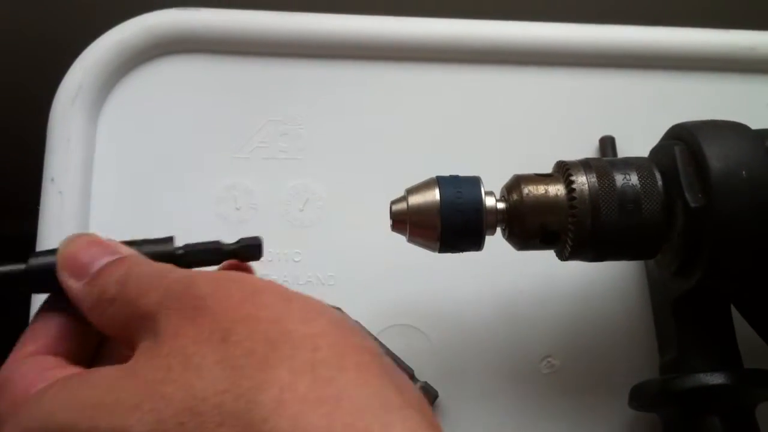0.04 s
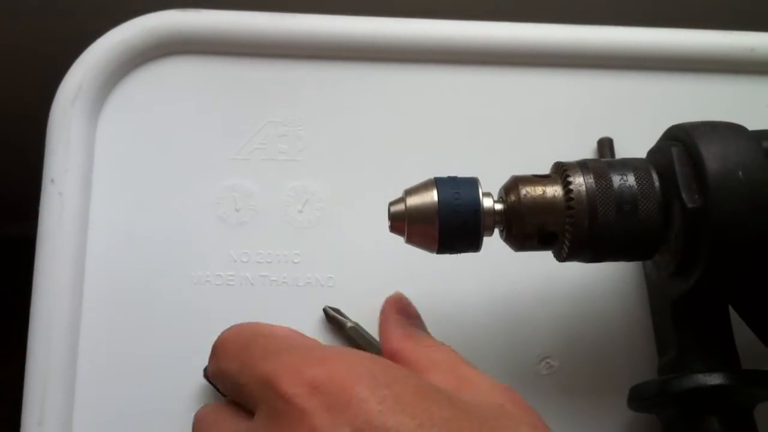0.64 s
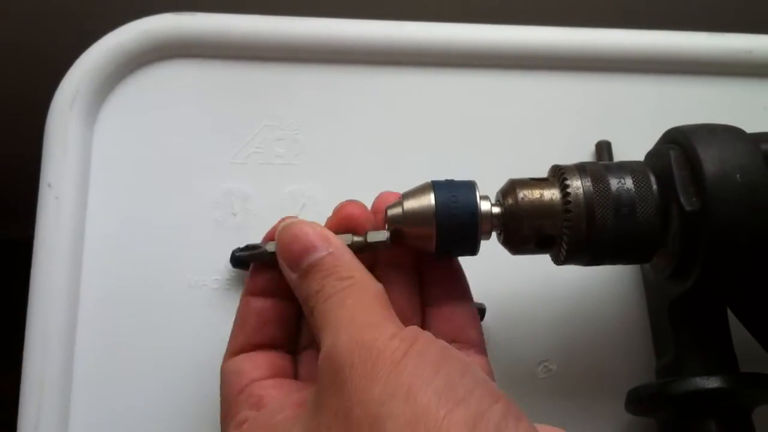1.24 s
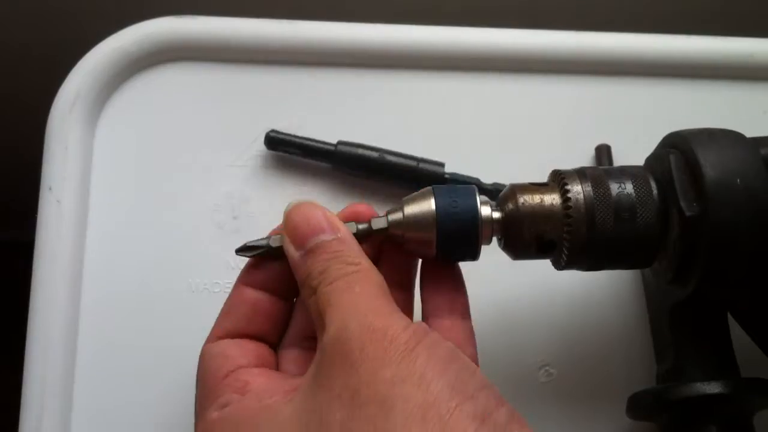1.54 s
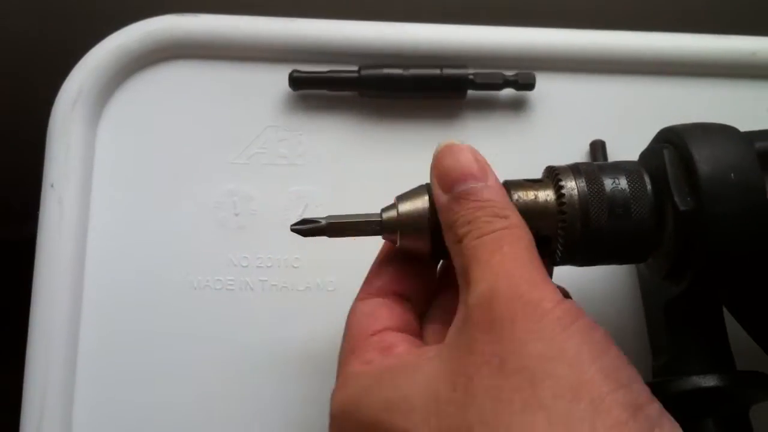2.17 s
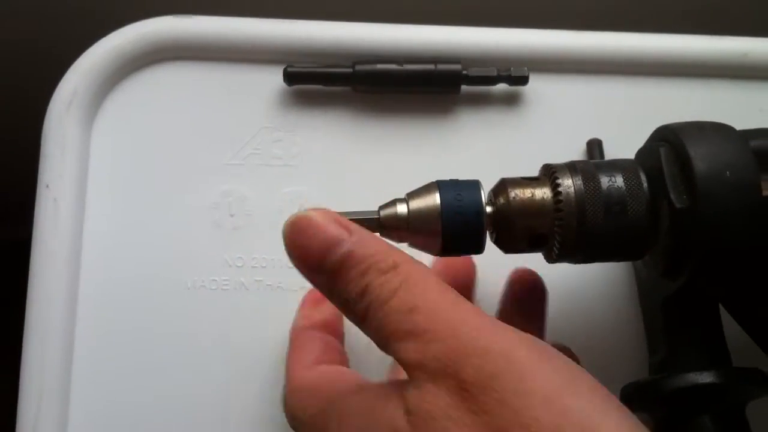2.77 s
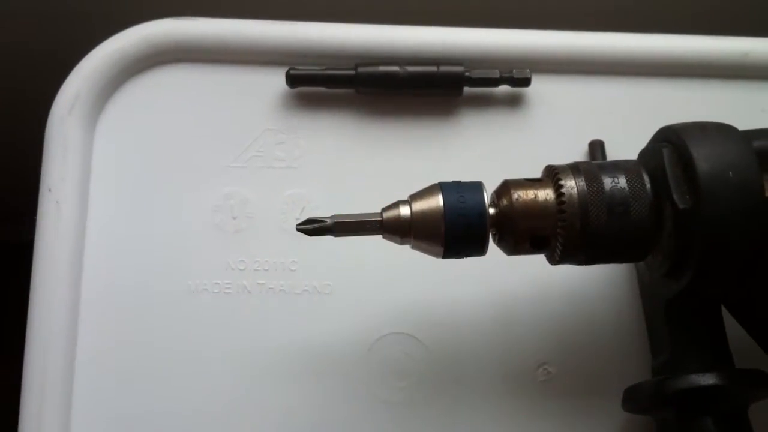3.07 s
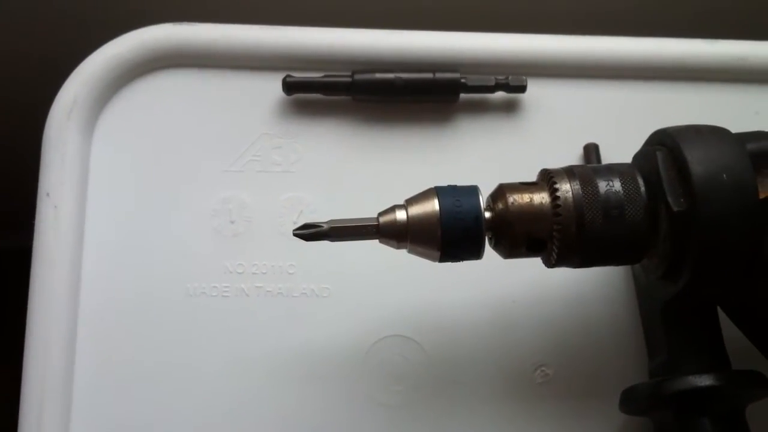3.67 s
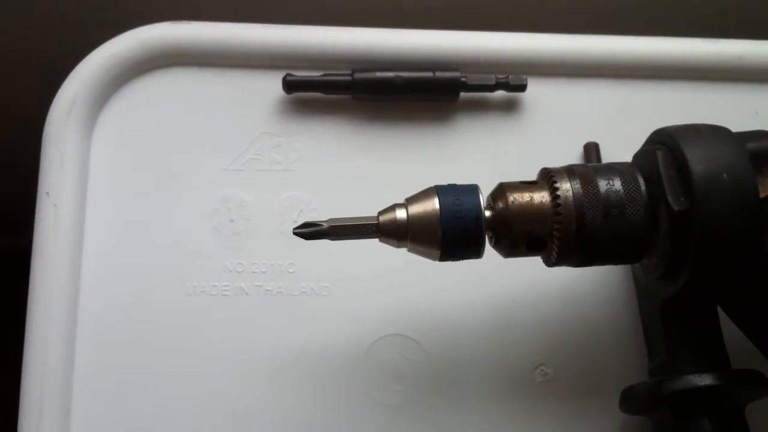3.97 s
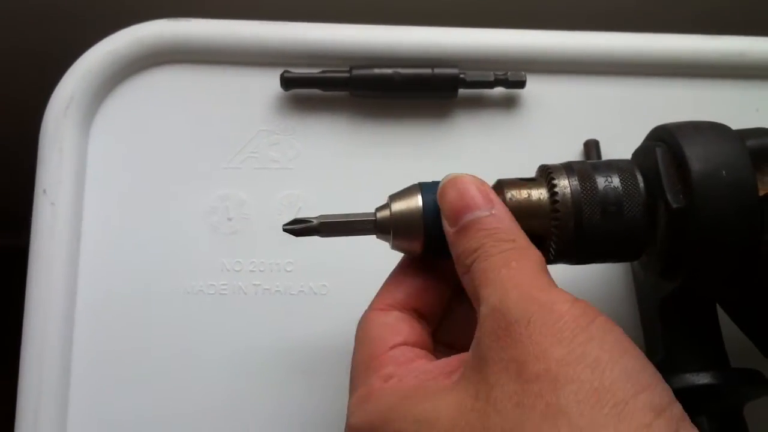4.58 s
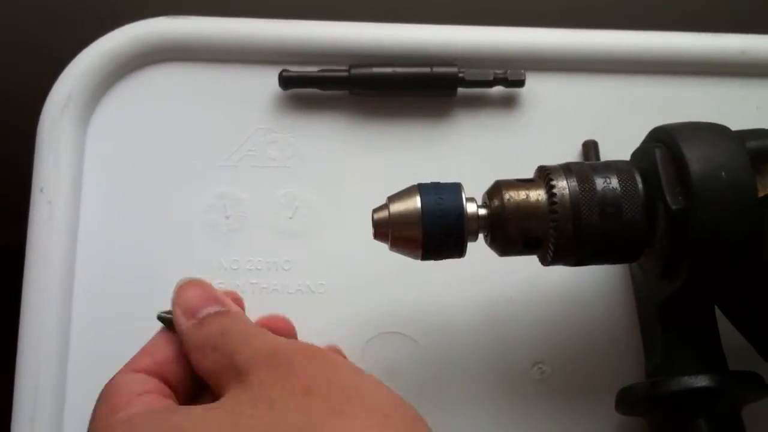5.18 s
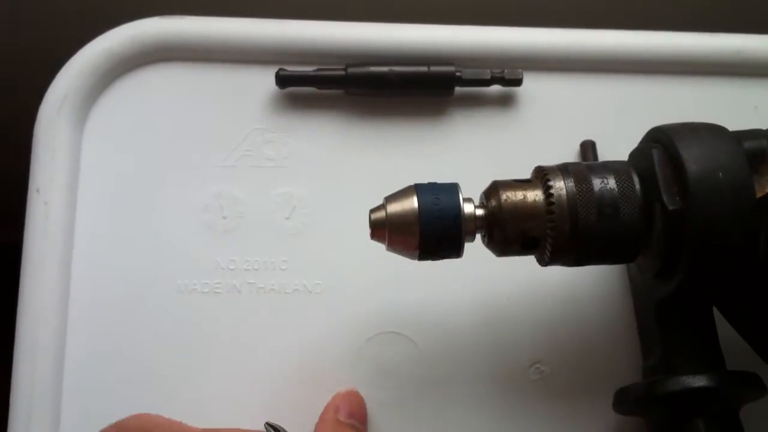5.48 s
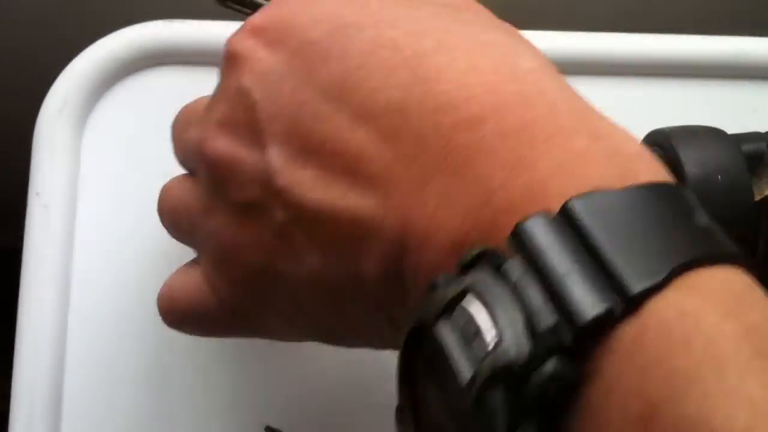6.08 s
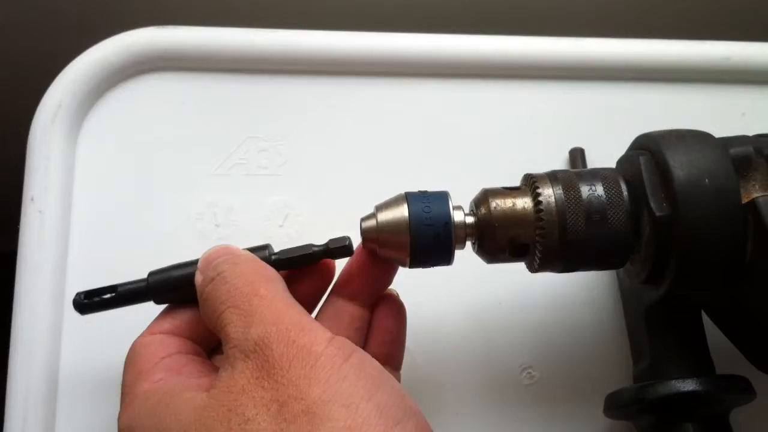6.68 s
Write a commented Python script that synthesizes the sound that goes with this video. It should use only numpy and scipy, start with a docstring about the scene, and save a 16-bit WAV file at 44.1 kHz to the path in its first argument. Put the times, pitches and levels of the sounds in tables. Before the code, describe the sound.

Steel bits click into and out of a drill chuck and clatter on a plastic tray, over a faint hiss.

```python
"""Steel bits are swapped in the quick-change chuck of a resting drill, over a plastic tray in a small room.
Over a steady hiss, fingers nudge the drill; a bit holder is put down, scrapes and rolls across the tray,
waking its modes. A screwdriver bit slides into the chuck and the sleeve snaps shut, steel ringing on steel.
The bit is released and dropped on the tray, where it bounces, and the holder is picked up again."""
import sys
import numpy as np
from scipy import signal
from scipy.fft import irfft
from scipy.io import wavfile

SR = 44100
rng = np.random.default_rng(int(sys.argv[2]) if len(sys.argv) > 2 else 0)


def pcm_store(signal):
    """Save signal as 16-bit PCM."""
    levels = np.round(np.clip(np.atleast_2d(signal), -1, 1) * 32767)
    wavfile.write(sys.argv[1], SR, levels.astype(np.int16).T)


N = 300762
TIME_S = np.arange(N) / SR
RING_S = np.arange(SR // 3) / SR  # time axis of one ring

# Spectrum of the tray's low rumble. Each row: frequency in Hz, gain in dB.
RUMBLE_SPECTRUM = [(40, -32), (85, -27.5), (120, 0.5), (165, 0.5), (200, -5), (245, 4.5), (295, 0),
                   (350, -13.5), (600, -18.5), (1200, -30), (4000, -65)]
# Spectrum of the struck chuck. Each row: frequency in Hz, gain in dB.
CHUCK_SPECTRUM = [(40, -30), (90, 0.5), (150, 5.5), (300, 5.5), (420, -18), (700, -5.5), (1200, -2),
                  (2000, 0.5), (3500, -1.5), (5000, -11.5), (6500, -4.5), (9500, -10), (13500, -2),
                  (16000, -3.5)]


def amp(db):
    """Decibels to gain."""
    return 10 ** (np.asarray(db) / 20)


def unit(x):
    """Scales to energy 1."""
    return x / np.sqrt(np.sum(x ** 2) + 1e-20)


def value_at(points, hz):
    """Linear interpolation over log frequency."""
    points_hz, values = np.transpose(points)
    return np.interp(np.log(hz + 1), np.log(points_hz), values)


def add(mix, start_s, sound):
    """Mixes a sound in at start_s."""
    part = mix[max(round(start_s * SR), 0):][:len(sound)]
    part += sound[:len(part)]


def colour(x, spectrum, size=4096):
    """Minimum-phase filter through (Hz, dB) points; attacks stay sharp."""
    hz = abs(np.fft.fftfreq(size, 1 / SR))
    log_gain = np.log(amp(value_at(spectrum, hz)))
    taps = np.fft.ifft(np.exp(np.conj(signal.hilbert(log_gain)))).real
    return signal.fftconvolve(x, taps[:size // 2])[:len(x)]


def decay(t60_s):
    """Envelope falling 60 dB in t60_s."""
    return amp(-60 * RING_S / t60_s)


def mode(hz, t60_s):
    """One decaying sine."""
    return np.sin(2 * np.pi * hz * RING_S) * decay(t60_s)


def ringing(modes):
    """Modes struck together, neighbours in opposite phase."""
    return unit(sum((-1) ** k * amp(db) * unit(mode(hz, t60_s))
                    for k, (hz, db, t60_s) in enumerate(modes)))


def grit(count, per_s, spread_db):
    """Random small contacts of uneven size, rms 1."""
    hit = rng.random(count) < per_s / SR
    sizes = amp(spread_db * np.minimum(rng.exponential(1, count), 3))
    signs = rng.choice([-1, 1], count)
    return unit(hit * sizes * signs) * np.sqrt(count)


def tap(travel_s, crack_db, wash_db, wash_t60_s, wash_hz):
    """A contact spreads as a bending wave, treble first, with a crack and a wash of crowded modes."""
    khz = np.fft.rfftfreq(len(RING_S), 1 / SR) / 1000
    wave = irfft(np.exp(-4000j * np.pi * travel_s * np.sqrt(khz)), len(RING_S))  # travel_s at 1 kHz
    crack, wash = rng.standard_normal((2, len(RING_S)))
    wash = signal.lfilter([1], [1, -np.exp(-2 * np.pi * wash_hz / SR)], wash)
    return (unit(wave * decay(t60_s=0.17))
            + amp(crack_db) * unit(crack * decay(t60_s=0.021))
            + amp(wash_db) * unit(wash * decay(wash_t60_s)))


def blow(ring, db, bass_db=0, clack_db=0, treble_db=0):
    """A heavy contact adds bass, a hard one clack and treble; db refers to energy spread over 5 ms."""
    force = [(290, bass_db), (420, 0), (950, 0), (1450, clack_db), (3000, clack_db), (6500, treble_db)]
    return amp(db) * np.sqrt(0.005 * SR) * colour(ring, force)


def hiss():
    """Room air: low, nearly steady noise."""
    # Each row: frequency in Hz, relative gain in dB.
    spectrum = [(18, -93.5), (30, -36), (69, -21), (177, -0.5), (292, -3), (324, -7.5), (389, -5),
                (518, -3), (561, -7.5), (830, -6), (1330, -13), (1470, -12), (2990, -20), (4420, -28),
                (15500, -34)]
    # Each row: time in seconds, rms level in dB.
    levels = [(0, -52), (2.6, -52), (3.05, -55.5), (3.6, -54), (6.8, -52.5)]
    rms = amp(np.interp(TIME_S, *np.transpose(levels)))
    return rms * np.sqrt(N) * unit(colour(rng.standard_normal(N), spectrum))


def tray_tone():
    """The tray's clear modes, struck together."""
    # Each row: frequency in Hz, relative level in dB.
    modes = [(130, -1), (152, 2), (166, 2), (243, -2), (276, -2), (298, -3), (350, -5), (372, -6),
             (530, -2), (765, 1), (908, -1), (1110, -4), (1360, -3), (1435, 2), (1560, -1), (1705, 0),
             (1826, -3), (2232, 0), (2430, -2), (2483, -1), (2784, -3), (2940, -3), (3180, 0), (3290, -1),
             (3838, -2)]
    # Each row: frequency in Hz, t60 in seconds.
    ring_times = [(150, 0.24), (300, 0.32), (800, 0.14), (3500, 0.091)]
    return ringing([(hz, db, value_at(ring_times, hz)) for hz, db in modes])


def tray():
    """The thin plastic tray, struck once; its wash differs from spot to spot."""
    # Each row: frequency in Hz, gain in dB.
    spectrum = [(40, -15), (85, -13), (110, 2), (145, 10.5), (300, 6.5), (450, 1), (900, 4), (1500, 0.5),
                (3200, -8), (4200, -8.5), (6200, -4.5), (9000, -7.5), (15000, -14.5)]
    contact = tap(travel_s=0.000667, crack_db=-0.5, wash_db=1, wash_t60_s=0.066, wash_hz=5860)
    return unit(colour(contact + amp(-11) * tray_tone(), spectrum))


def nudges():
    """Fingers push the drill and tray: soft, low thuds."""
    # Each row: start in seconds, relative level in dB.
    touches = [(0.027, -52), (0.211, -50), (1.06, -40), (1.098, -38), (1.551, -39), (2.032, -44),
               (2.172, -51.5), (2.83, -48.5), (4.495, -50), (4.709, -48.5), (5.183, -46), (6.03, -38.5)]
    out = np.zeros(N)
    for start_s, db in touches:
        thud = unit(colour(tray(), RUMBLE_SPECTRUM))
        add(out, start_s, blow(thud, db + 9.5))
    return out


def chuck():
    """The steel chuck with a bit held against it; each point of contact favours other modes."""
    # Each row: frequency in Hz, mean relative level in dB, t60 in seconds.
    modes = [(173.6, 6.5, 0.32), (247, 1, 0.34), (844, 0.5, 0.11), (1400, -15, 0.15), (1780, -8, 0.093),
             (2163, 5, 0.078), (2600, -8, 0.18), (3020, -28, 0.025), (4200, -19, 0.083), (6220, -7, 0.02),
             (6500, -9, 0.019), (9082, -1, 0.012), (10830, -9, 0.02), (12000, -39, .04),
             (13550, -12, 0.014), (14400, -18, 0.026)]
    contact = tap(travel_s=0.000323, crack_db=-1, wash_db=-2.5, wash_t60_s=0.047, wash_hz=5750)
    favoured = [(hz, db + rng.normal(0, 4), t60_s) for hz, db, t60_s in modes]
    return unit(unit(colour(contact, CHUCK_SPECTRUM)) + amp(-9) * ringing(favoured))


def clicks():
    """Steel rubs up to its stop in the chuck, strikes and rubs off again."""
    # Each row: strike time in seconds, relative level in dB, treble in dB, rub time constant in seconds.
    contacts = [(.099, -35.5, -13, 0.0056), (.111, -34.5, -2.5, .005), (1.350, -35.5, 3.5, 0.00061),
                (1.570, -32.5, -6.5, 0.00065), (1.924, -26, 1, 0.0013), (1.928, -29, -9, 0.0014),
                (1.991, -30, -10, .006), (2.009, -28.5, -7, 0.0012), (2.022, -40.5, 4, 0.0014),
                (2.032, -38.5, 7.5, .0013), (2.119, -49, -2, .0009), (2.6529, -20, 4, 0.0011),
                (2.658, -26.5, -1, 0.0014), (2.693, -30, -17, 0.00092), (2.813, -39, -6, 0.0012),
                (2.828, -43.5, -6, 0.0011), (2.839, -46.5, -1.5, 0.0027), (4.686, -37, -6, 0.00091),
                (4.692, -33.5, -19, 0.0054), (4.706, -30, -10, .0025), (4.7088, -31.5, 7, 0.00091),
                (4.849, -45, -7.5, 0.001), (4.881, -47.5, -5, .0008), (5.107, -37.5, -9, .009),
                (5.129, -33.5, 2.5, .004), (5.135, -31.5, -4, .0027), (5.173, -34.5, -7, .0024),
                (5.185, -34.5, -8, 0.0024), (6.570, -38.5, -12, 0.00063), (6.685, -38.5, -10, 0.0026)]
    out = np.zeros(N)
    from_strike_s = RING_S - RING_S[len(RING_S) // 8]
    strike = from_strike_s == 0
    for strike_s, db, treble_db, rub_s in contacts:
        rub = unit(grit(len(RING_S), per_s=14000, spread_db=-1) * np.exp(-abs(from_strike_s) / rub_s))
        force = unit(rub * (rub_s / 0.00094) ** 1.46 + strike)  # a long rub hides the strike
        seated = 1.95 < strike_s < 5.0  # a seated bit lowers the sleeve's hollow resonance
        hollow_hz, hollow_db = (1800, -3.5) if seated else (2270, -7)
        hollow = unit(colour(mode(hollow_hz, t60_s=0.005), CHUCK_SPECTRUM))
        low_knock = unit(mode(hz=855, t60_s=0.018))
        response = chuck() + amp(hollow_db) * hollow + amp(-18) * low_knock
        ring = unit(signal.fftconvolve(force, response)[:len(RING_S)])
        top_db = -1 + 0.42 * treble_db  # a soft contact loses the top octave fastest
        ring = colour(ring, [(8000, 0), (14000, top_db)])
        add(out, strike_s + from_strike_s[0], blow(ring, db + 1, bass_db=-7, treble_db=treble_db))
    return out


def pings():
    """Sleeve, holder and loose bit ring thinly after a contact; the bit's twin modes beat faintly."""
    # Sleeve or holder. Each row: start in seconds, frequency in Hz, level in dB, t60 in seconds.
    part_rings = [(0.109, 11170, -30.5, .018), (2.652, 6000, -49, .16), (2.652, 6500, -29, .046),
                  (4.709, 9082, -57, 0.12), (6.684, 2330, -32.5, .035)]
    # Each row: start in seconds, main mode's level in dB, its t60 in seconds.
    bit_rings = [(1.350, -33.5, 0.042), (2.653, -33, .04), (5.185, -34, .022), (5.604, -35, .045)]
    bit_hz, beat_hz = 13370, 45
    out = np.zeros(N)
    for start_s, hz, db, t60_s in part_rings:
        add(out, start_s, amp(db) * mode(hz, t60_s))
    for start_s, db, t60_s in bit_rings:
        twin = amp(-22) * mode(bit_hz + beat_hz, 6 * t60_s)
        add(out, start_s, amp(db) * (mode(bit_hz, t60_s) + twin))
    return out


def knock(db, bass_db, treble_db):
    """One contact with the tray; its hardness sets both clack and treble."""
    return blow(tray(), db + 3, bass_db, clack_db=5 + 0.28 * treble_db, treble_db=treble_db)


def knocks():
    """Steel lands and bounces on the tray; the rolling holder bumps as it tips over its edges."""
    # Each row: start in seconds, relative level in dB, bass in dB, treble in dB.
    landings = [(0.421, -36.5, 8, -18), (0.4273, -23, 0.5, -39), (.4545, -32.5, -6, -17),
                (.470, -28.5, -5, -22), (0.4777, -23.5, -9, -18.5), (.484, -24, 4, -42),
                (0.853, -34.5, 4.5, -31), (1.386, -34.5, 7.5, -16), (1.401, -31, 13, -17.5),
                (2.91, -39, 10, -9), (5.3895, -34.5, 5, -13.5), (5.591, -21, -2, -11),
                (5.6035, -14.5, -7, -7), (5.608, -28.5, -4, -7), (5.969, -34.5, -5, -18.5),
                (6.0613, -24.5, -7, -13), (6.069, -26, -5, -29), (6.107, -21.5, -8, -25)]
    # Each row: start in seconds, relative level in dB.
    bumps = [(1.138, -38.5), (1.1735, -31.5), (1.2346, -35.5), (1.312, -30.5), (1.336, -33.5), (1.655, -37),
             (1.696, -39), (1.764, -34.5)]
    out = np.zeros(N)
    for start_s, db, bass_db, treble_db in landings:
        add(out, start_s, knock(db, bass_db, treble_db))
    for start_s, db in bumps:
        add(out, start_s, knock(db, bass_db=2, treble_db=-40))
    return out


def tray_response(spectrum, tone_db):
    """The tray's answer to one tiny contact: a filtered impulse plus its modes."""
    impulse = RING_S == 0
    return unit(colour(impulse + amp(tone_db) * tray_tone(), spectrum))


def drags():
    """Steel scrapes over the plastic in tiny slips; an edge that bites sounds brighter."""
    # Each row: start in seconds, end in seconds, level in dB, treble in dB.
    scrapes = [(.852, 0.892, -33, -8.5), (0.882, 0.948, -33, 0), (1.384, 1.451, -43.5, 3),
               (5.995, 6.028, -46, 8), (6.013, 6.064, -42.5, -1)]
    # Each row: frequency in Hz, gain in dB.
    spectrum = [(60, -32), (150, 4), (290, 4.5), (430, -3), (1000, 5), (1900, -1.5), (3300, -12),
                (6000, -22.5), (9000, -22.5), (15000, -36)]
    out = np.zeros(N)
    surface = tray_response(spectrum, tone_db=-11.5)
    for start_s, end_s, db, treble_db in scrapes:
        slips = grit(round((end_s - start_s) * SR), per_s=1500, spread_db=1)
        response = colour(surface, [(1300, 0), (4500, treble_db)])
        add(out, start_s, amp(db) * signal.fftconvolve(slips, response))
    return out


def rolling():
    """The holder's weight drums the tray while its edges patter on the surface."""
    # Each row: time in seconds, relative level in dB.
    levels = [(0.96, -40), (1.026, -44), (1.064, -34.5), (1.258, -35), (1.34, -28.5), (1.366, -37),
              (1.406, -25.5), (1.448, -34.5), (1.772, -42), (1.814, -33), (1.912, -49.5), (2.046, -41.5),
              (2.074, -53), (2.1, -51)]
    # Each row: frequency in Hz, gain in dB.
    patter_spectrum = [(100, -47), (300, -15), (500, 6.5), (1100, 2), (2000, -2.5), (3200, -15.5),
                       (5000, -30.5), (15000, -42)]
    roll_db = np.interp(TIME_S, *np.transpose(levels), left=-np.inf, right=-np.inf)
    weight = amp(roll_db - 2) * grit(N, per_s=560, spread_db=0.3)
    edges = amp(0.35 * roll_db - 36.5) * grit(N, per_s=260, spread_db=3.5)  # grows more slowly
    rumble = signal.fftconvolve(weight, tray_response(RUMBLE_SPECTRUM, tone_db=-20))
    patter = signal.fftconvolve(edges, tray_response(patter_spectrum, tone_db=-15))
    return (rumble + patter)[:N]


def room(x, wet_db, build_s):
    """Adds a short diffuse tail, each band dying at its own rate."""
    # Each row: frequency in Hz, t60 in seconds, relative level in dB.
    bands = [(120, 0.35, -0.5), (320, 0.26, -5), (900, 0.21, -1.5), (2500, .16, 6), (6000, 0.2, 2.5),
             (14000, 0.097, 3.5)]
    hz, frame_s, noise = signal.stft(rng.standard_normal(len(RING_S)), SR, nperseg=256)
    t60_s, db = (value_at(np.array(bands)[:, [0, column]], hz)[:, None] for column in (1, 2))
    tail = signal.istft(noise * amp(db - 60 * frame_s / t60_s), SR, nperseg=256)[1][:len(RING_S)]
    tail = unit(tail * (1 - np.exp(-RING_S / build_s)))
    return x + amp(wet_db) * signal.fftconvolve(x, tail)[:N]


def scene():
    """Tray and chuck sounds in the room, over its hiss; mono."""
    on_tray = room(knocks() + nudges() + rolling() + drags(), wet_db=-11.5, build_s=0.002)
    at_chuck = room(clicks() + pings(), wet_db=-19.5, build_s=0.005)
    return (on_tray + at_chuck + hiss())[None]


def record(dry):
    """Steep low-pass band limit."""
    cutoff_hz = 15950
    taps = signal.firwin(401, cutoff_hz, window=("kaiser", 8), fs=SR)
    return signal.oaconvolve(dry, taps[None], "same")


dry = scene()
out = record(dry)
pcm_store(out)
```